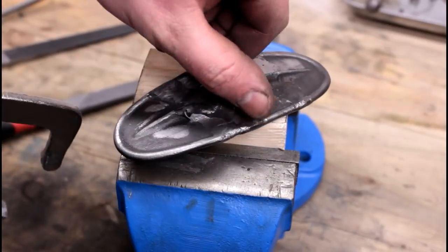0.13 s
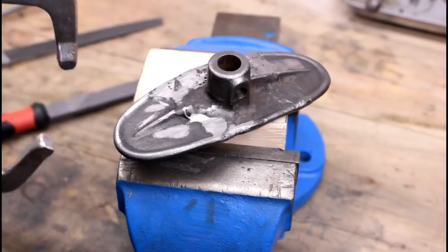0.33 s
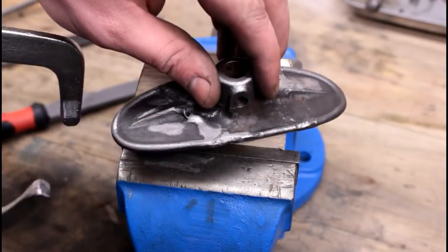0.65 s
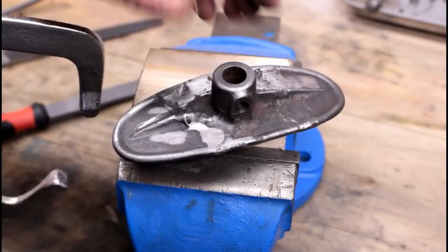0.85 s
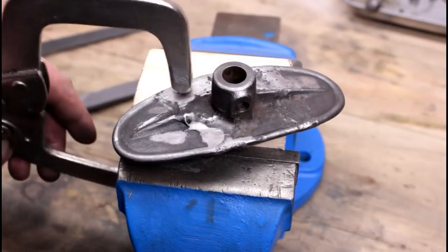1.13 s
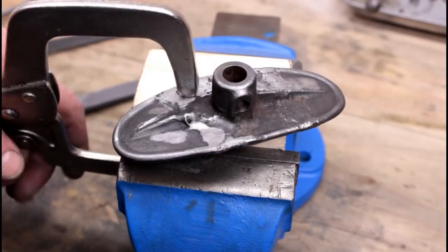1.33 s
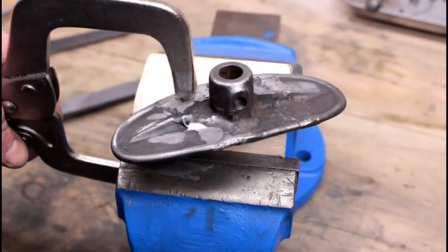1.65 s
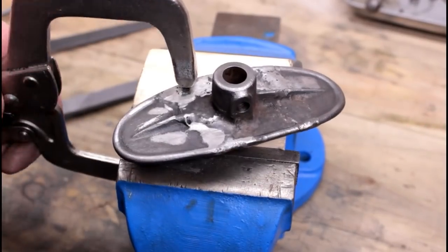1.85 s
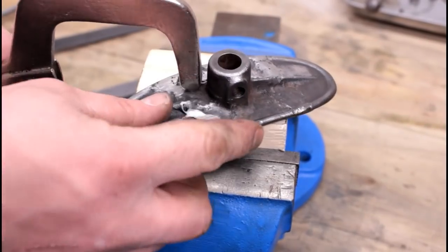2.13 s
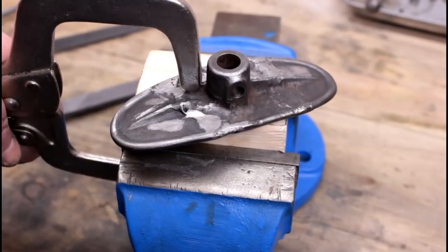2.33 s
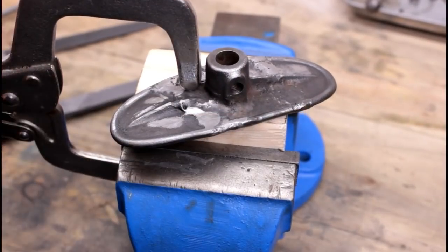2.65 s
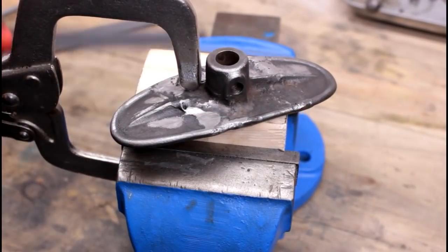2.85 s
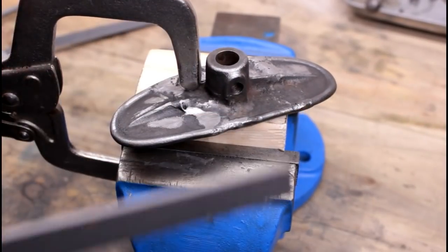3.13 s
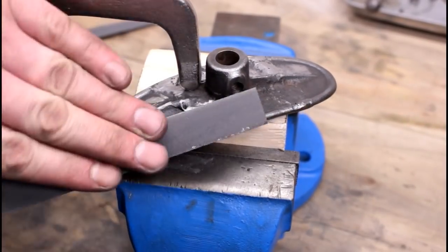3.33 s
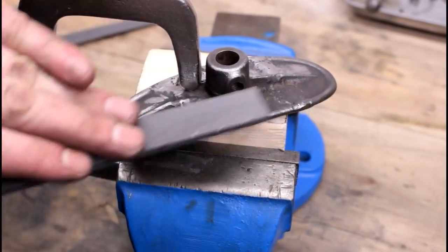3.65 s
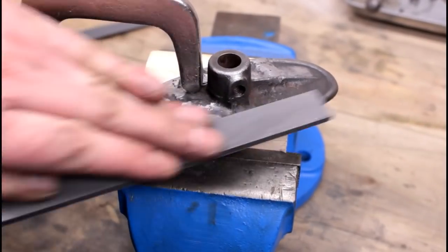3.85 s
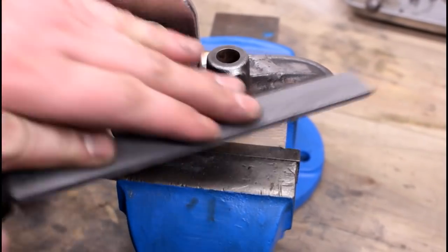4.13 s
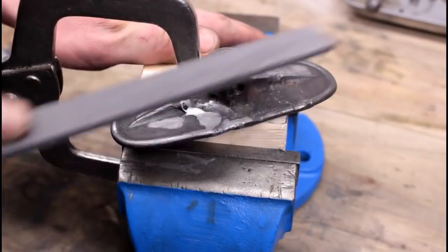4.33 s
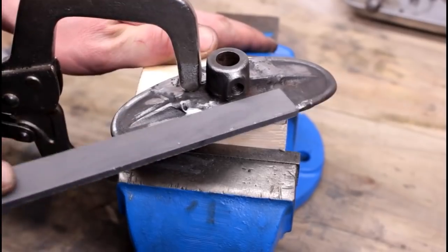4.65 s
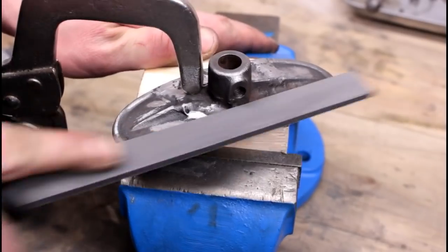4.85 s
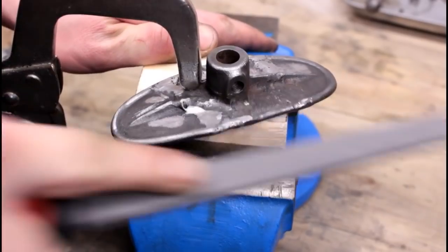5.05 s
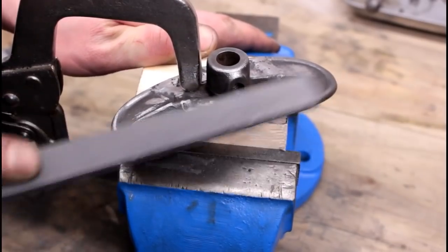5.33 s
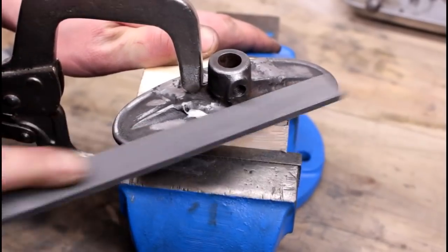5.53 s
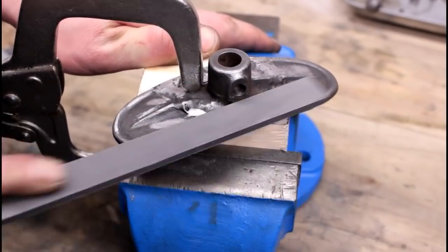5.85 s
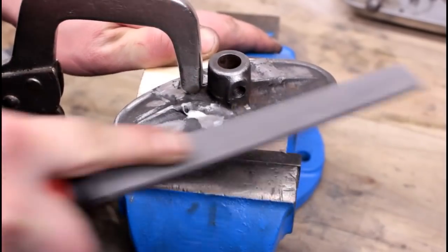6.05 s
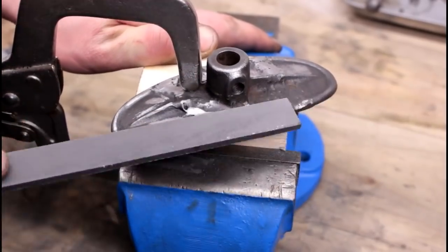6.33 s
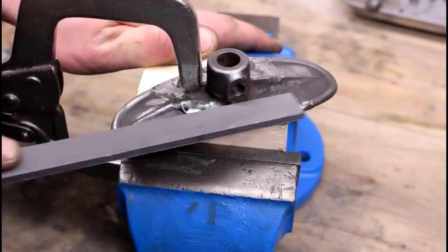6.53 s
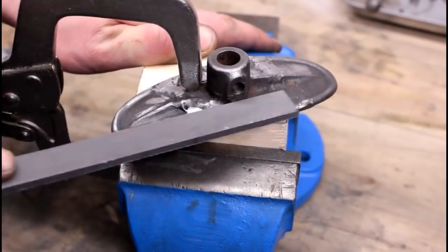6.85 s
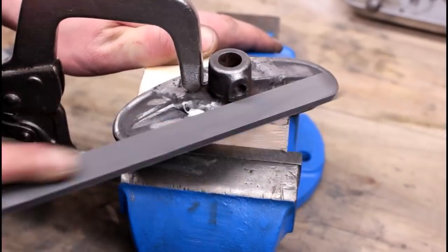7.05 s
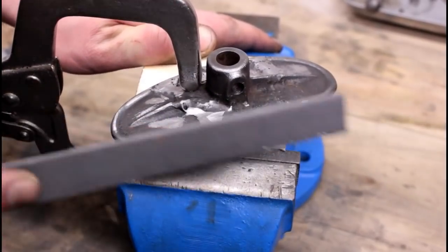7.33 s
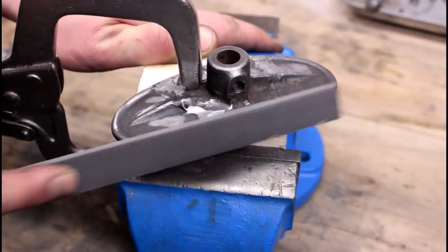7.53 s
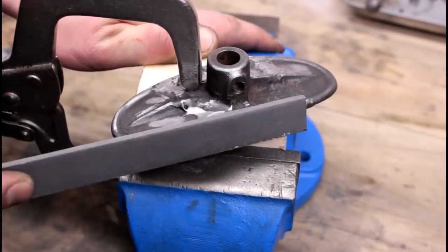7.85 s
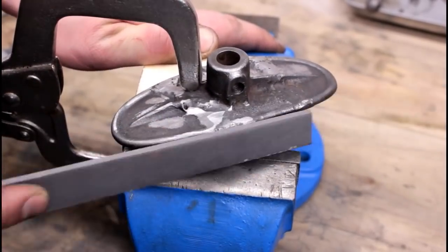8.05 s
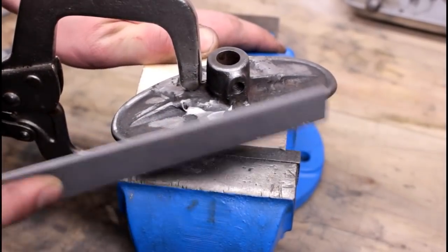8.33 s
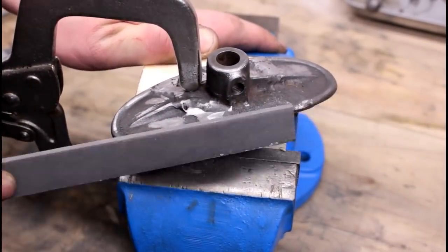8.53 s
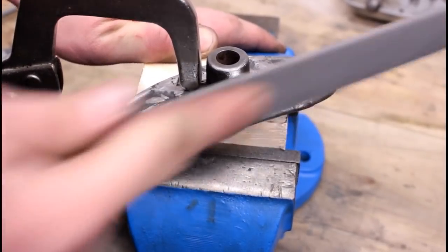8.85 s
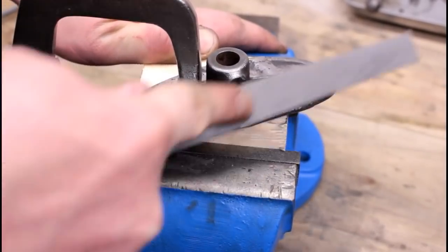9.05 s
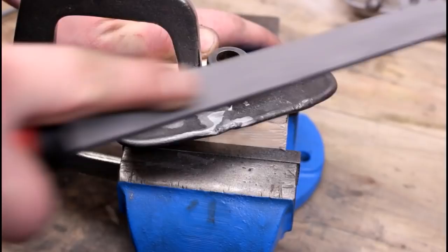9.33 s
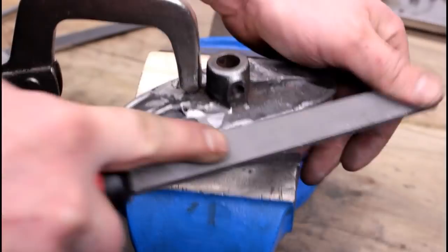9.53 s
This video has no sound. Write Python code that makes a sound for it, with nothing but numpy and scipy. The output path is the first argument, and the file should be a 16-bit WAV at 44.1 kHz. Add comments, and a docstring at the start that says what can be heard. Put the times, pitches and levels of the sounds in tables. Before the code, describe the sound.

A quiet workshop heard very close, dry, in narrow stereo, with faint air and a wavering low hum. Work is sped up, so sounds are clipped and choppy. From 0.5 s come barely audible hand scuffs; around 1.2 s small metal ticks, a clearer click at 1.5 s, and lighter touches to 2.3 s. At about 2.4 s the clamp snaps shut with a loud, bright crack, followed by faint fumbling and a dull thump. From 3.3 s a file scrapes the plate's rim: short gritty rasps with a midrange steel ring, roughly six to eight a second, growing stronger after 4 s. Hard metallic clacks punctuate them, notably near 4.2, 4.4, 4.8, 5.3, 5.9, 6.7 and 7.7 s, some with low bench jolts. Strokes are longer and more forceful from 8.4 to 9.1 s, with brief gaps. Loud knocks hit at 9.2 and 9.4 s, then final scrapes.

```python
"""A quiet workshop, heard close: a cast plate is clamped to a block in a bench vise, then filed along its rim.
The work runs in fast motion: short slices are joined by cross-fades, so sounds start and stop on one even grid.
File and clamp are noise clicks and blows through resonant modes over a broad wash, with levels set in three bands.
Bench thumps are damped sines; workshop air and its wavering hum are shaped noise."""
import sys
import numpy as np
from scipy import signal
from scipy.fft import rfft, irfft
from scipy.io import wavfile
from scipy.ndimage import uniform_filter1d

SR = 44100
rng = np.random.default_rng(int(sys.argv[2]) if len(sys.argv) > 2 else 0)


def file_out(sig):
    """Save sig as 16-bit WAV at sys.argv[1]."""
    # one column per channel
    cols = np.atleast_2d(sig).T
    # limit, then scale
    lim = np.clip(cols, -1, 1)
    pcm = np.round(lim * 32767).astype(np.int16)
    wavfile.write(sys.argv[1], SR, pcm)


N = 427769

SLICE_S, GRID_S, FADE_S = 0.0342, 0.0205, 0.0075  # slice length, first joint, cross-fade
SIZE, LEAD = 4096, 1024  # samples in a block, and those ahead of its slice
HZ = np.arange(SIZE // 2 + 1) * SR / SIZE
LOW_HZ, HIGH_HZ = 1500, 5000  # bounds of the middle band


def undb(db):
    """Amplitude factor of a level in dB."""
    return 10 ** (np.asarray(db) / 20)


def shape(points, hz):
    """Gain of (Hz, dB) points on a log-frequency axis."""
    f, db = np.transpose(points)
    return undb(np.interp(np.log(hz + 1), np.log(f), db))


def since(s, owner_s):
    """Seconds since each event, on the time axis of the slice that holds owner_s."""
    block_s = (np.arange(SIZE) - LEAD) / SR
    into_slice_s = (owner_s - GRID_S) % SLICE_S + s - owner_s
    return block_s - into_slice_s[:, None]


def splice(blocks, seconds):
    """Lays each block into the slice that holds its time, faded across both joints."""
    out = np.zeros((2, N + 2 * SIZE))
    t = (np.arange(SIZE) - LEAD) / SR
    window = np.clip(np.minimum(t, SLICE_S - t) / FADE_S + 0.5, 0, 1)
    for block, s in zip(blocks, seconds):
        joint_s = GRID_S + (s - GRID_S) // SLICE_S * SLICE_S
        at = int(joint_s * SR) + SIZE - LEAD
        out[:, at:at + SIZE] += block * window
    return out[:, SIZE:SIZE + N]


def resonance(hz, width_hz):
    """Complex response of a damped mode, 1 at its peak."""
    return 1 / (1 + 1j * (HZ ** 2 - hz ** 2) / (width_hz * (HZ + 1)))


def body(modes, wash, loud_hz, scatter_db, lift_db, own_db, own_width_hz, lag_s, spread_s):
    """Mid and side response for each contact: modes with fresh weights over a broad wash."""
    f, width_hz, db = np.array(modes, float).T[:, :, None]
    chance = rng.standard_normal((len(loud_hz), 2, len(modes) + 1))
    # the place of contact favours modes near one pitch and adds a ring of its own there
    near = np.exp(-(np.log(f.T / loud_hz[:, None]) / 0.085) ** 2)
    sign = (-1.0) ** np.arange(len(modes))
    gain = undb(db.T + scatter_db * chance[:, 0, 1:] + lift_db * near) * sign
    broad = shape(wash, HZ) + undb(own_db) * resonance(loud_hz[:, None], own_width_hz)
    # on average each part reaches the left microphone some microseconds after the right one
    lag = lag_s + spread_s * chance[:, 1]
    rings = resonance(f, width_hz)
    mid = gain @ rings + broad
    lagged = (gain * lag[:, 1:]) @ rings + lag[:, :1] * broad
    side = lagged * -1j * np.pi * HZ / (1 + HZ / 20000)
    return mid, side


def sound(push, response, dbs, measure):
    """Drives the body and sets its middle, low and high bands to their levels."""
    low = 1 / (1 + (HZ / LOW_HZ) ** 8)
    high = 1 - 1 / (1 + (HZ / HIGH_HZ) ** 16)
    # light contact has a duller top, above 10 kHz
    octaves = np.log2(np.maximum(HZ / 10000.0, 1))
    dull = undb(0.54 * np.minimum(dbs[2] + 9.5, 0)[:, None] * octaves)
    mid, side = (rfft(push) * r * dull for r in response)
    weight = 0
    for band, db in zip((1 - low - high, low, high), dbs):
        weight = weight + band * (undb(db) / measure(irfft(mid * band)))[:, None]
    mid, side = irfft(mid * weight), irfft(side * weight)
    return np.stack([mid + side, mid - side], axis=1)


def rub(table, response, grit_db, wander_db, swell):
    """Teeth and grit bite in dense clicks of uneven size, under a pressure that wanders and swells."""
    s, db, low_db, high_db, _ = np.transpose(table)
    size = (len(s), SIZE)
    clicks = rng.standard_normal(size) * undb(grit_db * rng.exponential(size=size).clip(0, 4))
    # smoothed twice over 130 samples, then scaled to a deviation near 1
    quick = uniform_filter1d(uniform_filter1d(rng.standard_normal(size), 130), 130) * 14
    # pressure builds towards a louder neighbouring row and eases away from it
    rise_db = swell * np.gradient(db).clip(-10, 10)[:, None]
    place = ((np.arange(SIZE) - LEAD) / (SLICE_S * SR) - 0.5).clip(-0.5, 0.5)
    push = clicks * undb(wander_db * quick + rise_db * place)

    def slice_rms(x):
        return x[:, LEAD:LEAD + int(SLICE_S * SR)].std(axis=1)

    return splice(sound(push, response, (db, db + low_db, db + high_db), slice_rms), s)


def knock(table, response, blow_db, crack_s, tail_s, ahead_s=FADE_S / 2):
    """A sharp blow, a few ms of chatter and a rattling tail, all cut off at the next joint."""
    s, db, low_db, high_db, _, tail_db = np.transpose(table)
    owner_s = s + ahead_s  # a blow inside a fade belongs to the slice that begins, or to the one that ends
    t = since(s, owner_s)
    chatter = np.exp(-np.abs(t) / crack_s)
    tail = undb(tail_db)[:, None] * np.exp(-np.abs(t) / tail_s)
    blow = undb(blow_db) * (t < 1 / SR)
    push = (rng.standard_normal(t.shape) * (chatter + tail) + blow) * (t >= 0)

    def peak(x):
        return np.abs(x).max(axis=1)

    silent_before = np.clip(1 + t / 0.00055, 0, 1)[:, None]
    struck = sound(push, response, (db, db + low_db, db + high_db), peak)
    return splice(struck * silent_before, owner_s)


def shop():
    """Workshop air with a wavering hum: shaped noise, a little different in level and tilt in every slice."""
    # air spectrum before scaling to air_rms_db: (frequency [Hz], density [dB])
    air_points = [(13, -13), (22, -6), (49, -3.5), (80, -21.5), (118, 3), (152, -4), (179, -12), (319, -7),
                  (482, -8), (2080, -14.5), (7000, -24), (8260, -26.5), (16000, -44.5)]
    # hum as narrow noise bands: (centre [Hz], width [Hz], level [dB])
    hum_bands = [(119, 25, -77), (241, 46, -58.5)]
    air_rms_db = -53.5
    s = GRID_S + SLICE_S * (np.arange(-1, N / SR / SLICE_S) + 0.5)
    chance = rng.standard_normal((len(s), 2, 1))
    air = shape(air_points, HZ)
    air = air * undb(air_rms_db) / np.sqrt(np.mean(air ** 2))
    hum = 0
    for f, width_hz, db in hum_bands:
        hum = hum + undb(db) * np.sqrt(SR / np.pi / width_hz) / (1 + 2j * (HZ - f) / width_hz)
    drift_db = 0.9 * chance[:, 0] + 0.25 * chance[:, 1] * np.log2(HZ / 500 + 0.1)
    colour = np.hypot(air, np.abs(hum)) * undb(drift_db)
    mid, other = (rfft(rng.standard_normal((len(s), SIZE))) * colour for _ in range(2))
    # close microphones differ mostly in the treble
    side = irfft((-0.3j * mid + 0.4 * other) * HZ / (HZ + 9000))
    mid = irfft(mid)
    return splice(np.stack([mid + side, mid - side], axis=1), s)


def bench():
    """The bench takes jolts: low, quickly damped sines, the same on both sides."""
    # jolts: (time [s], level before decay [dB], pitch [Hz])
    thumps = [(2.728, -32, 117.3), (3.996, -30.5, 132), (4.356, -28, 90), (5.321, -32, 201),
              (5.581, -38, 166), (5.896, -29.5, 245), (7.39, -40, 142), (9.188, -28.5, 111),
              (9.372, -41, 218), (9.573, -31.5, 129)]
    s, db, hz = np.transpose(thumps)
    owner_s = s + FADE_S / 2
    t = since(s, owner_s).clip(0)
    thump = undb(db)[:, None] * np.sin(2 * np.pi * hz[:, None] * t) * np.exp(-t / 0.0091)
    return splice(thump[:, None], owner_s)


def clamping():
    """Hands set the plate, the clamp is fitted, snaps shut and is let go: scuffs and blows ring clamp and block."""
    # scuffs of hands and clamp, one slice each: (middle [s], mid-band level [dB],
    # block re level [dB], edge re level [dB], loudest ring [Hz])
    handling = [(0.482, -60.5, -3, -1, 3650), (0.516, -64, 0, 6, 243), (0.619, -54, -18, -4.5, 2860),
                (0.687, -57, -8, -5, 2850), (1.2, -55.5, 3, -11, 3650), (1.235, -51, 3, -9, 516),
                (1.269, -49.5, 10.5, 0.5, 327), (1.508, -57, -11, -2, 2800), (1.577, -56.5, -9, 0, 6870),
                (1.713, -55.5, -21, 6.5, 6480), (1.748, -57.5, 16, 3, 296), (1.884, -58, 3, -2, 7200),
                (1.953, -59, -12, -3, 2840), (2.021, -45.5, 0.5, -3, 3700), (2.055, -58.5, 11, -3, 532),
                (2.09, -43.5, -6, -2, 9660), (2.295, -52, -10, -5, 2000), (2.329, -57, -4, 2, 6260),
                (2.397, -36, 6.5, -3, 980), (2.671, -54.5, -7, -3.5, 3000), (2.705, -68, 33, -4, 130),
                (2.739, -70.5, 30, -6, 124), (2.808, -58.5, 20, -13, 514), (2.842, -55, 14, -9, 190),
                (3.013, -60.5, -5, 1, 2920), (3.081, -60, -13, 4, 4900)]
    # clamp ticks, snap and thumps: (time [s], mid-band peak [dB], thud re peak [dB], edge re peak [dB],
    # loudest ring [Hz], tail re chatter [dB])
    ticks = [(0.5208, -36.5, -6, -23, 1500, -20), (1.211, -33, -5, -3, 533, -20),
             (1.2349, -25.5, 1, -1, 5460, -22), (1.2449, -29, 1, 8, 5400, -15),
             (1.514, -21, -20.5, -1.5, 2870, 2), (1.5276, -35, -19, -6, 2780, -26),
             (1.784, -45.5, 2, 5, 401, -20), (1.7952, -33, -17, 2.5, 6840, -20),
             (1.9623, -38, 4, -2, 554, -20), (2.074, -29, -29, 10, 6480, -11),
             (2.279, -32.5, -17, -16, 4100, -7), (2.379, -1, -14, -0.5, 2180, -32),
             (2.677, -46, 26, -15, 590, -9)]
    # modes of clamp and block: (frequency [Hz], width [Hz], gain [dB])
    clamp_modes = [(115.7, 14, -6), (265, 83, -12), (292, 26, -3), (509, 77, 6), (1012, 220, -26),
                   (1483, 34, -1), (2070, 38, -15.5), (2160, 68, 1), (2870, 25, -7), (3230, 33, -4),
                   (3800, 25, -10), (4220, 39, -12), (4500, 130, -17), (5080, 79, -21), (5600, 120, -12),
                   (6500, 45, 2), (7030, 93, -14.5), (7580, 130, -1), (9200, 111, -14.5), (9750, 90, -14)]
    # broad response under the modes: (frequency [Hz], gain [dB])
    clamp_wash = [(80, -32), (300, 1.5), (1500, -8.5), (5000, -8), (9000, -10), (12000, -23), (15500, -32)]
    steel = dict(modes=clamp_modes, wash=clamp_wash, scatter_db=3.0, lift_db=3.0, lag_s=15e-6, spread_s=12e-6)
    rubbed = body(loud_hz=np.array(handling)[:, 4], own_db=13.0, own_width_hz=45.0, **steel)
    ticked = body(loud_hz=np.array(ticks)[:, 4], own_db=2.0, own_width_hz=120.0, **steel)
    return (rub(handling, rubbed, grit_db=3.0, wander_db=0.0, swell=0.2)
            + knock(ticks, ticked, blow_db=2.0, crack_s=0.0061, tail_s=0.049))


def stroke_slices():
    """Level and colour of every slice: a stroke builds to its bite, drops on lifting and dies; the louder one wins."""
    # file strokes: (lands [s], bites hardest [s], mid-band level there [dB], build-up [dB per slice],
    # drop on lifting [dB], plate and block re level [dB], edge hiss re level [dB], loudest ring [Hz])
    strokes = [(3.252, 3.252, -44.5, 0, 2, 4.5, -13.5, 3100), (3.355, 3.389, -22, 30, 20, 0.5, -6, 2300),
               (3.56, 3.594, -25, 3, 36, -3.5, -10.5, 2330),
               (3.663, 3.731, -22.5, 4, 30, -6.5, -11.5, 3470), (3.8, 3.868, -26, 2, 38, -5, -7.5, 3470),
               (3.936, 3.971, -22.5, 14.5, 11, -8.5, -8.5, 2650),
               (4.073, 4.107, -17.5, 23, 31, -11, -8.5, 3060), (4.21, 4.21, -33.5, 0, 29, 1.5, -11, 3340),
               (4.278, 4.278, -19, 0, 27.5, -9, -7.5, 2570), (4.415, 4.415, -20, 0, 19.5, -9.5, -4, 3500),
               (4.518, 4.552, -16, 21.5, 7.5, -12.5, -5.5, 2560),
               (4.689, 4.723, -22, 8, 29.5, -10, -4.5, 3460), (4.826, 4.86, -20, 18, 31.5, -16, -5.5, 3190),
               (4.997, 4.997, -21.5, 0, 11, -12.5, -5, 3660), (5.099, 5.099, -42.5, 0, 27, 2.5, -22, 2270),
               (5.202, 5.236, -18, 10.5, 21.5, -9.5, -5.5, 3430),
               (5.339, 5.407, -18, 15, 42, -10, -8, 2780), (5.475, 5.475, -30.5, 0, 21.5, 5.5, -13, 930),
               (5.544, 5.544, -18, 0, 24, -13.5, -7, 3490), (5.646, 5.646, -36, -2, 30, 3, -22, 2460),
               (5.681, 5.715, -19.5, 11, 37, -15, -6.5, 3400),
               (5.817, 5.852, -23, 15, 9.5, -10.5, -7, 3330),
               (5.988, 6.023, -25.5, 24.5, 6.5, -8.5, -6.5, 3800),
               (6.194, 6.228, -19.5, 7, 37.5, -15.5, -8.5, 2910),
               (6.33, 6.399, -20.5, 14.5, 16.5, -11, -5, 2770), (6.501, 6.501, -27, 0, 12, 0.5, -21, 2340),
               (6.536, 6.57, -19, 14.5, 27.5, -13, -5, 3780),
               (6.707, 6.741, -18.5, 10, 27, -15, -5.5, 3230), (6.843, 6.878, -23, 11, 8.5, -9.5, -7, 3800),
               (7.014, 7.049, -22, 29, 13.5, -11, -5, 4120), (7.185, 7.254, -23, 9.5, 31, -8.5, -9, 2250),
               (7.391, 7.391, -42, 0, 28, 11, -17, 460), (7.527, 7.562, -18.5, 2.5, 38, -3.5, -9.5, 2290),
               (7.664, 7.733, -17.5, 12, 38, -7.5, -10.5, 3590),
               (7.835, 7.835, -36, 0, 16.5, 5.5, -12, 2300),
               (7.904, 7.904, -17.5, -1, 8.5, -9.5, -7.5, 2620), (8.006, 8.075, -44, 3, 30, 2.5, -17, 2290),
               (8.109, 8.143, -14.5, 16.5, 21, -10, -9, 3240), (8.211, 8.211, -48, 0, 30, -4, -16, 1510),
               (8.28, 8.314, -43, 8, 30, 3, -30, 2310), (8.348, 8.348, -45.5, 0, 30, 11, -28, 1060),
               (8.382, 8.417, -21.5, 4, 44, -5.5, -13, 2310),
               (8.519, 8.588, -17.5, 10, 20.5, -4.5, -15.5, 3630),
               (8.724, 8.793, -16, 13, 26.5, -8, -7, 2670),
               (8.93, 9.032, -13.5, 12, 39.5, -8.5, -8.5, 2300), (9.135, 9.169, -44, -3, 29, 12, -26, 990),
               (9.237, 9.272, -21, 7, 39, -5.5, -10, 3720), (9.443, 9.443, -37, 0, 8, -4.5, -7.5, 3300),
               (9.511, 9.511, -17, 2, 28.5, -10.5, -4.5, 3300), (9.614, 9.614, -47.5, 0, 30, 5, -25, 404),
               (9.648, 9.682, -24, 0, 40, -10, -8, 3540)]
    # pairs are (building up, after lifting)
    plate_share, edge_share = (0.55, 0.98), (0.41, 0.28)  # plate gain, edge loss [dB per dB under the bite]
    plate_top_db, edge_floor_db = (9.5, 6.5), -17  # limits of both
    linger_db, die_db = -58, 19  # second slice after lifting: highest level, least further drop
    clean_db = 10  # a smaller drop on lifting stops clean
    light_hz = 2272  # loudest ring of a light touch
    # loudest ring of plate and block, once the level is free_gap_db under the bite
    free_hz, free_gap_db, free_scatter = (1050, 1458), (36, 18), 0.22
    rows = {}
    chance = rng.standard_normal((len(strokes), 2))
    for stroke, luck in zip(strokes, chance):
        lands_s, bites_s, db, build_db, drop_db, plate_db, edge_db, loud_hz = stroke
        first, top = (int((s - GRID_S) // SLICE_S) for s in (lands_s, bites_s))
        gaps_db = {k: build_db * (top - k) for k in range(first, top + 1)}
        gaps_db[top + 1] = drop_db
        if drop_db >= clean_db:
            gaps_db[top + 2] = max(drop_db + die_db, db - linger_db)
        for k, gap_db in gaps_db.items():
            lifted = int(k > top)
            ring_hz = loud_hz if gap_db < 9 else light_hz
            if gap_db > free_gap_db[lifted]:
                ring_hz = free_hz[lifted] * np.exp(free_scatter * luck[k % 2])
            middle_s = GRID_S + (k + 0.5) * SLICE_S
            level_db = db - gap_db
            plate = min(plate_db + plate_share[lifted] * gap_db, max(plate_db, plate_top_db[lifted]))
            edge = max(edge_db - edge_share[lifted] * gap_db, min(edge_db, edge_floor_db))
            if middle_s < N / SR and level_db > rows.get(k, (0, -np.inf))[1]:
                rows[k] = (middle_s, level_db, plate, edge, ring_hz)
    return np.array([rows[k] for k in sorted(rows)])


def filing():
    """Strokes of the file and its knocks: gritty clicks and blows ring file, plate and block together."""
    # file lands on or slaps the plate: (time [s], mid-band peak [dB], thud re peak [dB], edge re peak [dB],
    # loudest ring [Hz], tail re chatter [dB], 1 if caught in the last moment of a slice: only a dry tick is left)
    knocks = np.array([(3.2884, -27.5, -1, -24, 2250, -20, 0), (3.3755, -23, 5.5, -15, 2340, -18, 0),
                       (3.5117, -31.5, -3, -16, 2780, -17, 0), (3.6451, -11.5, -11, -10, 3900, -20, 0),
                       (4.2066, -3.5, -38, 5.5, 3600, -26, 0), (4.338, -18.5, -5, -3, 3280, -17, 0),
                       (4.3556, 1, -24, 2, 3530, -24, 0), (4.6356, -22, 3, -9, 2320, -26, 0),
                       (4.6444, -4, -13, -8, 3840, -12, 0), (4.777, -22.5, 1.5, -12, 2660, -4, 0),
                       (4.793, 0, -24, -3.5, 3420, -36, 0), (4.9458, -5.5, -34, -15, 2860, -21, 1),
                       (5.2493, -6, -24, -8, 3670, -27, 0), (5.3213, 1.5, -16.5, -7.5, 3440, -23.5, 0),
                       (5.474, -16, -2, -10.5, 2220, -20, 0), (5.899, 0.5, -36, -12.5, 2480, -26, 0),
                       (6.1404, -19, 1.5, -19, 2280, -18, 1), (6.6523, -18.5, -0.5, -4, 2790, -19, 0),
                       (6.6623, 4, -20, -7, 3520, -26, 0), (6.6815, -13.5, -3, -25.5, 3650, -29, 0),
                       (6.98, -7.5, -9.5, -17.5, 2760, -12, 0), (7.4032, -27.5, 2, -21, 3800, -23, 0),
                       (7.5197, -7.5, -14, -16, 3580, -21, 0), (7.7261, -4, -26, -22, 3300, -36, 0),
                       (7.8266, -13, -6, -14, 2360, -16, 0), (7.9093, -6.5, -22, -25, 2700, -4, 0),
                       (8.5004, -10, -0.5, -14, 2260, -30, 0), (9.1155, -27, 7, -19, 2250, -10, 0),
                       (9.1904, 1.5, -18, -6.5, 3540, -23.5, 0), (9.371, 1.5, -18.5, -7, 3210, -17, 0),
                       (9.4945, -24, -12, -13, 3360, -25, 0)])
    # modes of file, plate and block: (frequency [Hz], width [Hz], gain [dB])
    file_modes = [(314.5, 143, -14.5), (469.3, 60.4, -2.5), (684.5, 78, -6), (942, 89, -3.5),
                  (1022.4, 22, -2), (1180, 65, 1), (1445, 22, -11.5), (1794, 37, -1.5), (1983, 46, -10.5),
                  (2205, 82, 2.5), (2580, 300, -4.5), (2852, 150, 1), (3253, 97, -3), (3418, 52, 3.5),
                  (3671, 63, 1.5), (3994, 87, -1), (4316, 30, -11.5), (4696, 130, -14), (5316, 63, -2.5),
                  (6060, 50, -7.5), (6600, 1200, -23.5), (7740, 140, -8), (8490, 130, -18.5),
                  (9460, 110, -13.5), (9960, 200, -19.5), (11170, 67, -15)]
    # broad response under the modes: (frequency [Hz], gain [dB])
    file_wash = [(150, -47), (400, -23), (1500, -10), (3000, -10.5), (4600, -11.5), (8000, -13),
                 (11500, -22.5), (12300, -32.5), (15500, -48)]
    ports = dict(lag_s=20e-6, spread_s=20e-6)
    slices = stroke_slices()
    level_db = slices[:, 1:2]
    # a light touch damps the steel less, so its ring stands out more
    free_db = -0.3 * (level_db + 20)
    stroked = body(file_modes, file_wash, slices[:, 4], scatter_db=3.5, lift_db=2.0,
                   own_db=free_db, own_width_hz=90.0, **ports)
    # a lighter touch skips more
    stutter_db = 1.1 + 0.071 * (level_db.max() - level_db)
    crack_wash = [(hz, db + 1.5) for hz, db in file_wash]  # a blow is more crack than ring
    struck = body(file_modes, crack_wash, knocks[:, 4], scatter_db=3.0, lift_db=2.0,
                  own_db=2.0, own_width_hz=200.0, **ports)
    ahead_s = np.where(knocks[:, 6] > 0.5, -1, 1) * FADE_S / 2
    return (rub(slices, stroked, grit_db=3.0, wander_db=stutter_db, swell=0.34)
            + knock(knocks[:, :6], struck, blow_db=14.0, crack_s=0.0021, tail_s=0.042, ahead_s=ahead_s))


def scene():
    """Sum of all sources, in stereo."""
    return filing() + clamping() + bench() + shop()


def record(dry):
    """Peaks clip at full scale; the bass is shared by both channels; the top is cut."""
    left, right = np.clip(dry, -1, 1)
    high_pass = signal.butter(1, 1400.0, "high", fs=SR, output="sos")
    side = signal.sosfiltfilt(high_pass, left - right) / 2
    both = np.clip((left + right) / 2 + np.array([side, -side]), -1, 1)
    top_cut = signal.ellip(8, 0.2, 60, 15700, fs=SR, output="sos")
    return signal.sosfilt(top_cut, both)


dry = scene()
out = record(dry)
file_out(out)
```